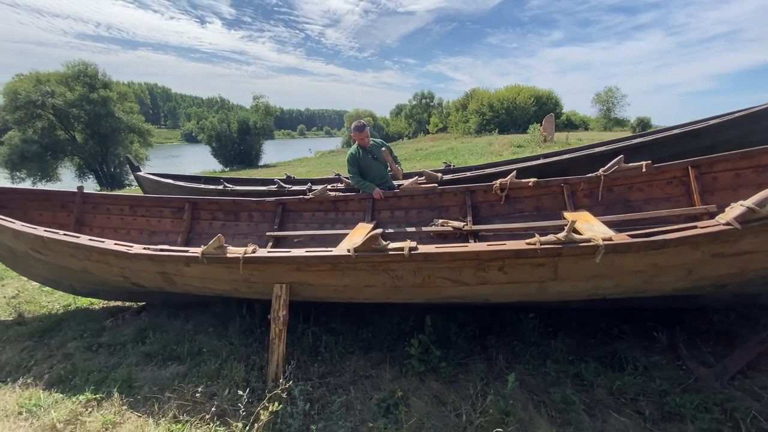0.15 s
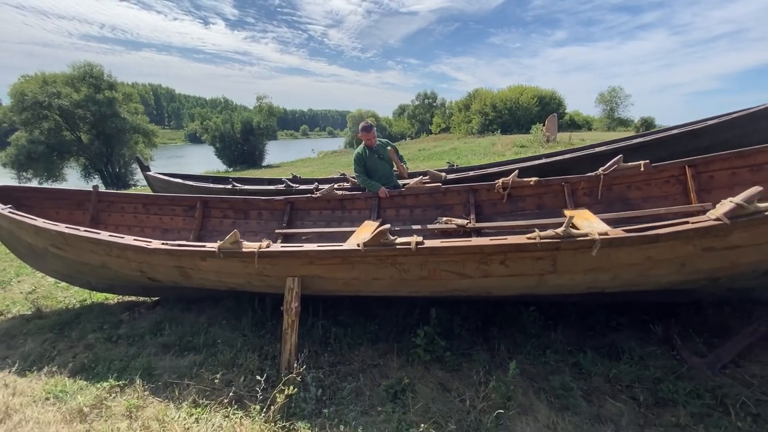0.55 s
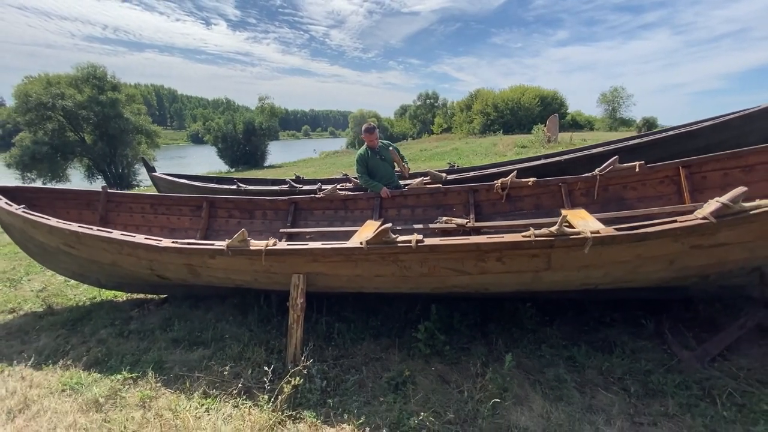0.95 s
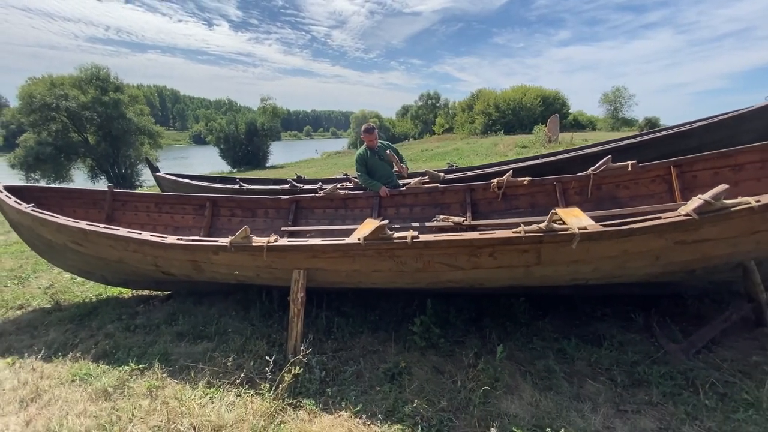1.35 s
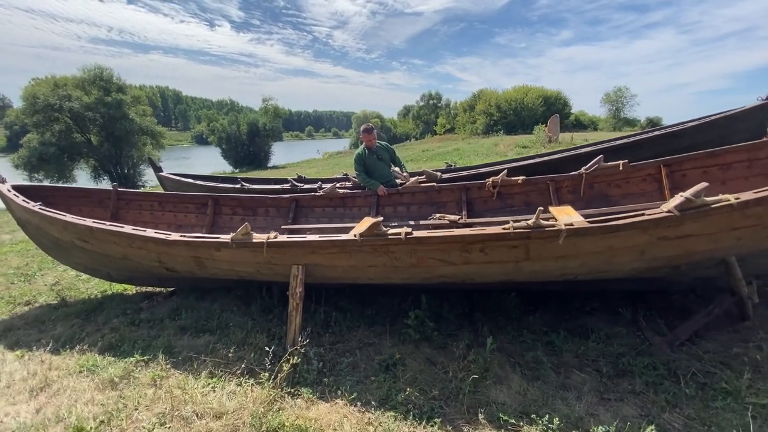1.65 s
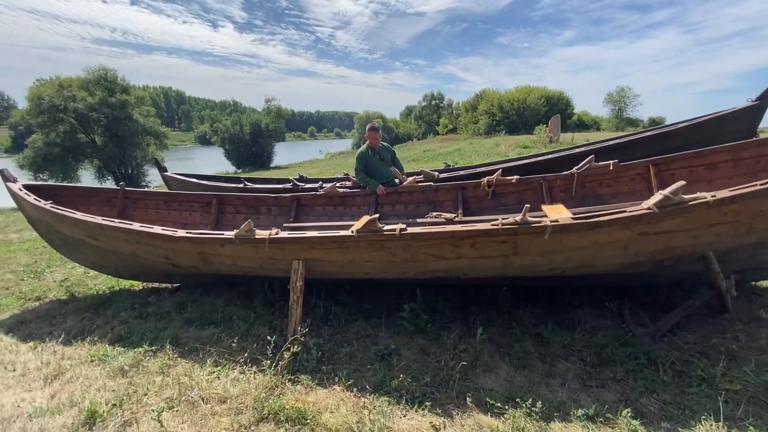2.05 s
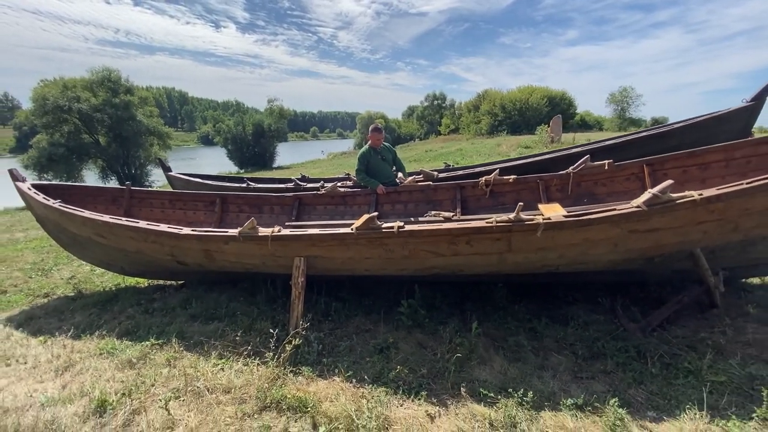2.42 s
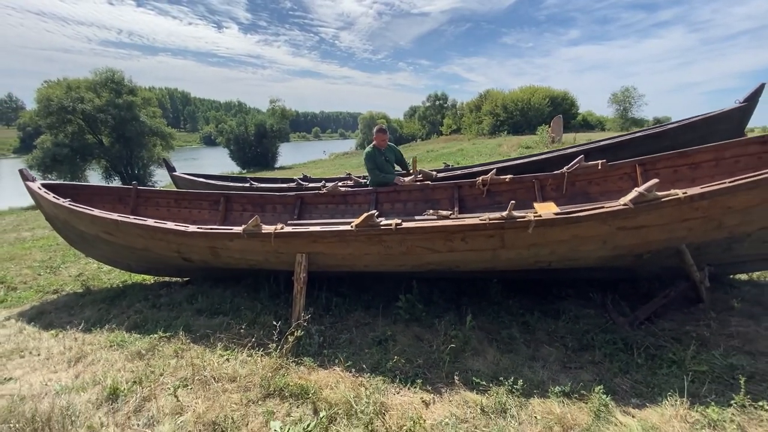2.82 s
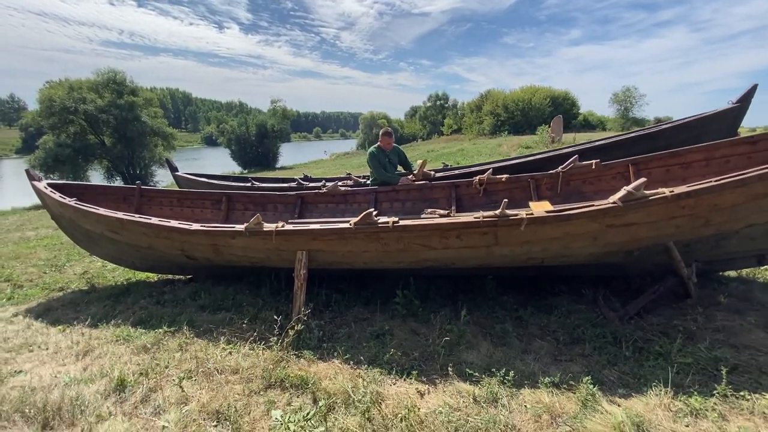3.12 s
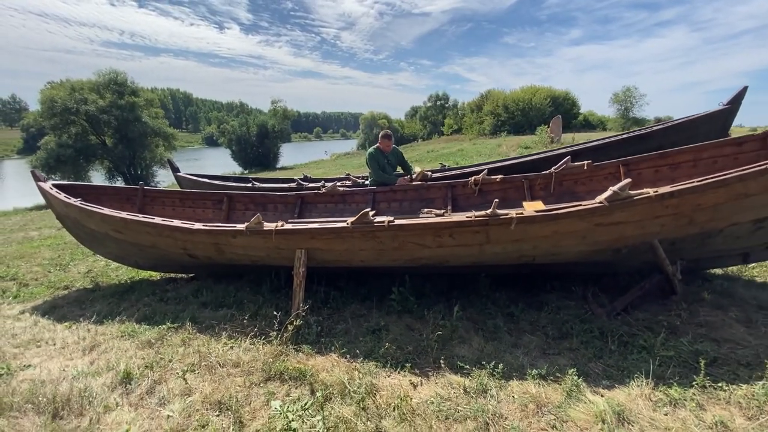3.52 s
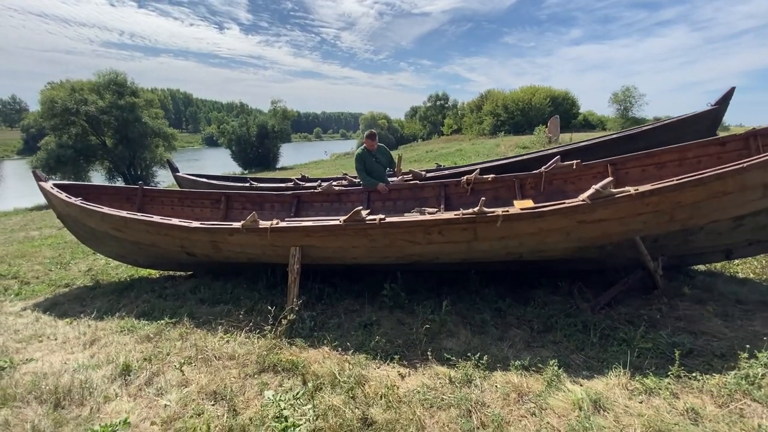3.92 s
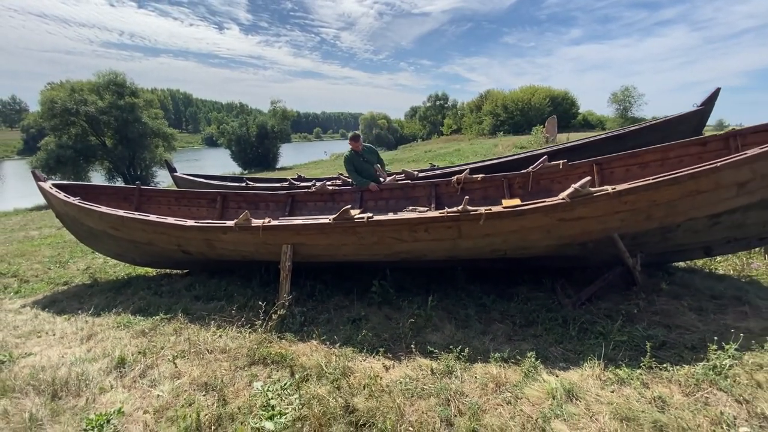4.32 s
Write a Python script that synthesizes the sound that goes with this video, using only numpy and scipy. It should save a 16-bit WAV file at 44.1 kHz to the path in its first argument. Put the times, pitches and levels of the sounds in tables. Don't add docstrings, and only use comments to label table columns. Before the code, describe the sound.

Outdoors on grass, close and loud wooden knocks dominate a faint airy background. Seven blows land at an uneven, unhurried pace, the later ones darker, with small bounces of the mallet. A short gap holds only breeze, leaves and a tiny insect tick, then two hard, bright blows finish. Each has a splintery crack, short peg ring and drum-like hull boom, mono and dry with a slight outdoor echo.

```python
import sys
import numpy as np
from scipy import signal
from scipy.fft import rfft, irfft
from scipy.io import wavfile
from scipy.ndimage import map_coordinates

SR = 44100
rng = np.random.default_rng(int(sys.argv[2]) if len(sys.argv) > 2 else 0)


def digitize_waveform(pressure):
    field = np.atleast_2d(pressure).T
    bounded = np.clip(field, -1, 1)
    quanta = np.round(bounded * 32767).astype(np.int16)
    wavfile.write(sys.argv[1], SR, quanta)


def boost_factor(decibels):
    exponent = np.asarray(decibels, float) / 20
    return 10 ** exponent


N = 197017


def evened(x):
    return x / np.sqrt(np.mean(x ** 2) + 1e-20)


def read(points, hz):
    f, value = np.transpose(points)
    return np.interp(np.log(hz + 1), np.log(f + 1), value)


def add(mix, s, sound):
    part = mix[round(s * SR):][:len(sound)]
    part += sound[:len(part)]


def coloured(x, colour):
    gain = boost_factor(read(colour, np.fft.rfftfreq(len(x), 1 / SR)))
    return evened(irfft(rfft(x) * gain, len(x)))


def slow(hz):
    knots = rng.standard_normal(300)
    return map_coordinates(knots, [np.arange(N) / SR * hz], order=3)


def bumps(events):
    t = np.arange(N) / SR
    return sum(boost_factor(db) * np.exp(-((t - s) / length) ** 2) for s, db, length in events)


# t/s, level/dB, length/s
PUFFS = [
    (0.0, -46, 0.047),
    (.09, -47, 0.061),
    (.18, -49, 0.018),
    (3.2, -69.5, .3),
]


def wind():
    fade_db = -64.5 - 3 * np.arange(N) / SR
    lumps_db = 5 * slow(3.2)
    gusts = boost_factor(fade_db + lumps_db) + bumps(PUFFS)
    colour = [(30, -16), (60, 0.5), (100, 0.5), (160, -13.0), (300, -26.5), (1000, -68.5)]
    return gusts * coloured(rng.standard_normal(N), colour)


# f/Hz, level/dB per Hz
AIR = [(30, -18), (130, -8), (250, -11), (600, -7), (1300, -9), (5500, -18.5), (10000, -30.5), (15800, -35)]


def air():
    return boost_factor(-57 - 3.5 + 0.27 * slow(17.0)) * coloured(rng.standard_normal(N), AIR)


def rustle(s, db, centre_hz, octaves):
    hz, t, z = signal.stft(rng.standard_normal(N + 1024), SR, nperseg=512)
    away = np.log2((hz[:, None] + 1) / np.interp(t, s, centre_hz)) / octaves
    fall_db = -6 * np.where(away > 0, 4.2 * away, away) ** 2
    hiss = signal.istft(z * boost_factor(fall_db), SR, nperseg=512)[1][:N]
    return evened(hiss) * boost_factor(np.interp(np.arange(N) / SR, s, db) + 1.3 * slow(2.5))


# t/s, level/dB, centre of the hiss f/Hz
LEAVES = [(0, -64, 6000), (0.502, -69, 6160), (1.5, -65.5, 6315), (2.201, -63.5, 7140), (2.698, -75, 6730),
          (3.198, -73, 7830), (3.6, -65.5, 7923), (3.9, -66, 7314), (4.149, -69, 6620), (4.47, -68.5, 5890)]


def leaves():
    s, db, hz = np.transpose(LEAVES)
    branch_db = -78.5 + 0.59 * (db - db.mean())
    branch_lead_s, branch_hz = -0.2, 10150
    branches = rustle(s - branch_lead_s, branch_db, branch_hz + 0 * hz, octaves=0.37)
    return rustle(s, db, hz, octaves=1.0) + branches


# f/Hz, width/Hz, level/dB rms
DRONE = [(150, 16, -73.5), (181, 11, -77.5), (292, 14.2, -83), (371, 15, -72), (467, 16, -73),
         (556, 26, -66), (730, 10, -69.5), (830, 24, -73), (1122, 30, -74.5), (1273, 40, -72.5),
         (1430, 55, -73.5), (1658, 19, -74.5)]


def drone():
    f, z = np.fft.rfftfreq(N, 1 / SR), rfft(rng.standard_normal(N))
    out = np.zeros(N)
    for hz, width, db in DRONE:
        band = z / (1 + (2 * (f - hz) / width) ** 2)
        out += boost_factor(db) * evened(irfft(band, N))
    return out


def driven(modes, seat):
    hz, loose_db, tight_db, home_db, last = np.transpose(modes)
    a, b = rng.uniform(-1, 1, (len(hz), 2)).T
    db = tight_db + max(1 - seat, 0) * (loose_db - tight_db) + max(seat - 1, 0) * (home_db - tight_db)
    return hz * (1 + 0.012 * a), db + 1.5 * b, last


def ring(hz, db, t60, rise_cycles):
    out = np.zeros(SR // 2)
    for k, (f, level_db, last) in enumerate(zip(hz, db, np.clip(t60, .008, .5))):
        t = np.arange(min(int(last * SR * 1.4), len(out))) / SR
        rise = 1 - np.exp(-t * f / rise_cycles)
        fall = boost_factor(level_db - 60 * t / last)
        add(out, 0, (-1) ** k * rise * fall * np.sin(2 * np.pi * f * t))
    return out


# delay t/s, f/Hz, level/dB
THUDS = [
    (0, 800, 4.5),
    (.0055, 430, -6),
    (0.0129, 370, -7.5),
    (.033, 230, -19.5),
]


def thuds():
    out, t = np.zeros(SR // 2), np.arange(600) / SR
    for delay, hz, db in THUDS:
        swell = np.sin(np.pi * np.minimum(t * hz / 1.81, 1))
        add(out, delay, -boost_factor(db) * np.sin(2 * np.pi * hz * t) * swell)
    return out


# f/Hz, level/dB with the peg loose, tight and home, t60/s (time to fall 60 dB)
HULL = [(209.1, -12, -4.5, 0, .18), (245.2, -17, -3, -3, .22), (275.4, -17, -7.5, -8.5, 0.22),
        (322.3, -5, -3.5, -6, 0.14), (351.5, -9, -6.5, -5, 0.22), (412, -14.5, -7.5, -2.5, 0.18),
        (459.2, -9, -8.5, 0, 0.1), (541, -12.5, -15.5, -10, 0.22), (590, 2, -15.5, 1.5, 0.083),
        (713.2, 1.5, -12, -7.5, 0.1), (758, -6.5, -16.5, -14.5, 0.17), (800, -3, -18.5, -9, 0.049),
        (876, -6.5, -17.5, -6, 0.089), (907, -12, -19, -13, 0.021)]


def planks(seat):
    return boost_factor(-13.5) * ring(*driven(HULL, seat), rise_cycles=1.9)


# f/Hz, level/dB with the peg loose, tight and home, t60/s
KEEL = [(65.7, -19, -17.5, -19, 0.31), (81, -10.5, -13.5, -13.5, .35), (91.3, -17, -6, -15, .3),
        (109.8, -12.5, -6, -13.5, 0.39), (117.6, -6, -17, -10.5, 0.37), (143.2, -2.5, -1.5, -11, 0.22),
        (153.5, -12.5, -8.5, -9.5, 0.33), (182, -17, 2.5, -8.5, .22), (179.9, -12.5, -6.5, -8.5, 0.17)]


def keel(seat, dull_db):
    return boost_factor(-14.5 + .4 * dull_db) * ring(*driven(KEEL, seat), rise_cycles=0.79)


# f/Hz, level/dB per Hz
CRACK = [(500, -15.5), (1500, 9.5), (3500, -9), (6000, -5.5), (10000, -14.5), (16000, -23.5)]


def crack():
    t = np.arange(SR // 2) / SR
    slap = boost_factor(-21.5) * (0.37 + np.exp(-((t - .0125) / 0.0025) ** 2)) / (1 + (t / 0.013) ** 16)
    scatter = boost_factor(-30.5 - 60 * t / 0.05) + boost_factor(-40.5 - 60 * t / 0.2)
    fall = boost_factor(-60 * t / .014) + slap + scatter
    rise = 1 - np.exp(-(t / 0.00059) ** 2)
    return coloured(rng.standard_normal(len(t)), CRACK) * rise * fall


# f/Hz, level/dB per Hz
RATTLE = [(60, -19), (150, -0.5), (400, 2), (1000, -2.5), (2000, -6), (4000, -9), (8000, -33),
          (16000, -41.5)]
# f/Hz, t60/s
RATTLE_T60 = [(60, 0.39), (160, 0.15), (420, 0.1212), (1100, 0.075), (2900, 0.049), (7700, 0.0098),
              (16000, 0.075)]


def rattle():
    t = np.arange(SR // 2) / SR
    hz, z = np.fft.rfftfreq(len(t), 1 / SR), rfft(coloured(rng.standard_normal(len(t)), RATTLE))
    out = np.zeros(len(t))
    for f in 62.5 * 2. ** np.arange(9):
        band = irfft(z * np.clip(1 - abs(np.log2((hz + 1) / f)), 0, 1))
        out += band * (1 - np.exp(-t * f / 0.97)) * boost_factor(-60 * t / read(RATTLE_T60, f))
    return out


# f/Hz, width/Hz, share
CHOKE = (940, 680, 0.34)


def choked(x, grip):
    hz, width, share = CHOKE
    middle = signal.lfilter(*signal.iirpeak(hz, hz / width, SR), x)
    return x - np.clip(grip * share, 0, 1) * middle


# f/Hz, level/dB with the peg loose, tight and home, width/Hz
RAIL = [(1194.4, -13, -14.5, -4, 600), (1624.4, 2.5, -0.5, -5, 90), (2085, -18, -15, -19, 110),
        (2277, -8.5, -8, -6.5, 220), (2617, -10, -8.5, -4.5, 160), (2918, -8, -6.5, -8.5, 130),
        (3187, -19.5, -12, -7, 230), (3800, -11, -11.5, -10, 99), (4180, -22.5, -17.5, -4.5, 170),
        (4500, -21, -11, -6, 180), (4970, -19.5, -15.5, -9, 210)]
# level/dB loose, tight and home, width/Hz, how late the slot chokes it
SHANK = (7.5, -2.5, 1.5, 148.5, 6.5)


def peg_ring(seat, grip, shank_hz, dull_db):
    loose_db, tight_db, home_db, shank_width, _ = SHANK
    free_db = loose_db if seat < 1 else home_db
    shank = (shank_hz, free_db + grip * (tight_db - free_db), shank_width)
    hz, db, width = np.c_[driven(RAIL, seat), shank]
    return ring(hz, db + 0.098 * dull_db * hz / 1000, 2.57 / width, rise_cycles=1.1)


# f/Hz, level/dB per Hz
BANK = [(200, -26.5), (600, 0.5), (1300, 0.5), (2600, -3), (4500, -13.5), (8000, -21), (16000, -47.5)]


def bank(peg):
    t = np.arange(SR // 2) / SR - .07
    shape = np.clip(t / 0.019, 0, 1) * (boost_factor(-60 * t / 0.065) + boost_factor(-11.5 - 60 * t / 0.61))
    a, b = rng.standard_normal((len(t), 2)).T
    ringing = coloured(signal.fftconvolve(b, peg)[:len(t)], [(800, -13.5), (4000, 0.3)])
    return boost_factor(-46.5) * (coloured(a, BANK) + boost_factor(-6.5) * ringing) * shape


# t/s, boom level/dB, sharpness level/dB, seat of the peg (0 loose, 1 tight, 2 home),
# pitch of the free shank f/Hz
BLOWS = [
    (0.2484, 1, 1.5, 0.15, 1150),
    (0.6537, -0.5, 3.5, 0.08, 1130),
    (1.0775, 2, 2.5, 0.13, 1730),
    (1.4944, 3.5, 3.5, 0.31, 1409),
    (1.8261, 2.5, -0.5, 0.92, 763),
    (2.1273, 2.5, -5, 0.99, 740),
    (2.4321, 3.5, -2.5, 0.92, 744),
    (3.263, 1, 7.5, 1.8, 2718),
    (3.5518, 3, 4.5, 1.78, 1390),
]
# t/s, boom level/dB, sharpness level/dB
BOUNCES = [
    (1.854, -9, -17),
    (2.173, -18, -21),
    (2.4825, -7.5, -20),
    (3.2865, -8.5, -11),
    (3.574, -13, -14),
]


def hammer():
    push, ribs = boost_factor(-3.5) * thuds(), rattle()
    out = np.zeros(N)
    blows = [(*row, 0) for row in BLOWS]
    bounces = [(*row, 1.4, 1750, -20) for row in BOUNCES]
    for s, boom_db, sharp_db, seat, shank_hz, dull_db in blows + bounces:
        grip = max(1 - abs(seat - 1), 0) ** SHANK[4]
        boom = planks(seat) + keel(seat, dull_db) + boost_factor(0.56 * dull_db) * push
        add(out, s, boost_factor(boom_db) * boom)
        peg = boost_factor(1.3 * sharp_db - 4) * peg_ring(seat, grip, shank_hz, dull_db)
        shake = boost_factor(.8 * sharp_db + 0.79 * dull_db) * (boost_factor(-9) * ribs + boost_factor(-7.5) * rattle())
        noisy = choked(shake + boost_factor(sharp_db + dull_db - 6) * crack(), grip)
        add(out, s + .0005, noisy + peg)
        add(out, s, boost_factor(sharp_db + dull_db) * bank(peg))
    return out


# t/s, level/dB, length/s
INSECT = [
    (2.77, -78, .07),
    (2.88, -85, .07),
    (3.92, -78, .09),
]


def insect():
    colour = [(9500, -35), (11500, -1), (13300, -1), (14300, -6), (15800, -25)]
    return bumps(INSECT) * coloured(rng.standard_normal(N), colour)


def scene():
    meadow = wind() + air() + leaves() + drone()
    return (meadow + hammer() + insect())[None]


def low_pass(x):
    return signal.sosfilt(signal.butter(12, 16840, fs=SR, output="sos"), x)


def record(dry):
    ceiling, knee, low_hz, edge_hz = .76, 3.5, 62., 16050
    flat = dry / (1 + abs(dry / ceiling) ** knee) ** (1 / knee)
    flat = signal.sosfilt(signal.butter(2, low_hz, "high", fs=SR, output="sos"), flat)
    edge = signal.firwin(511, edge_hz, window=("kaiser", 9), fs=SR)
    finished = signal.oaconvolve(flat, edge[None], "same")
    return low_pass(finished)


dry = scene()
out = record(dry)
digitize_waveform(out)
```